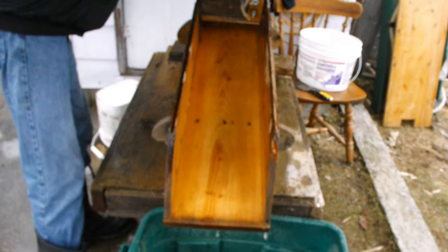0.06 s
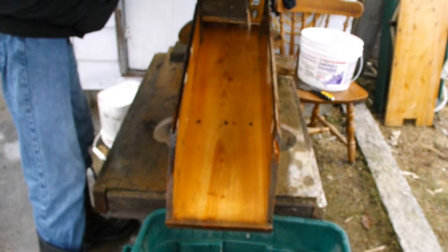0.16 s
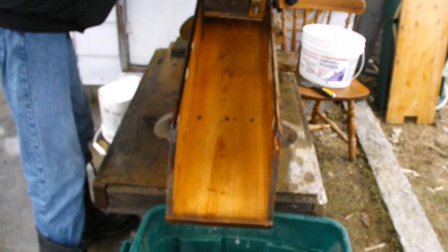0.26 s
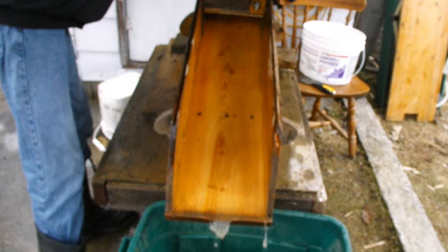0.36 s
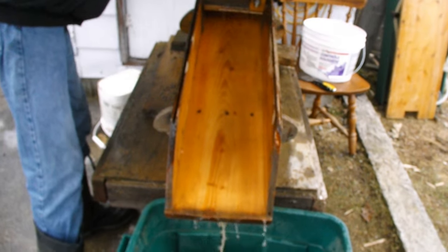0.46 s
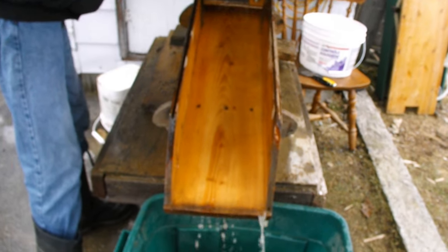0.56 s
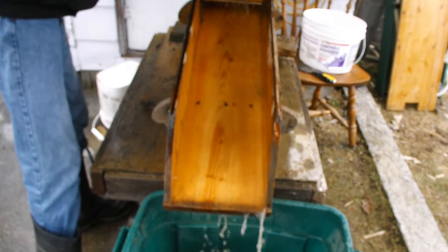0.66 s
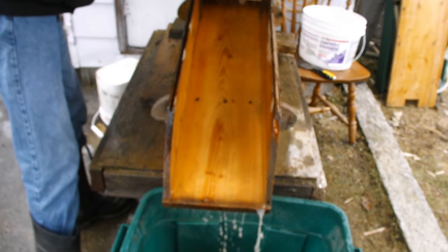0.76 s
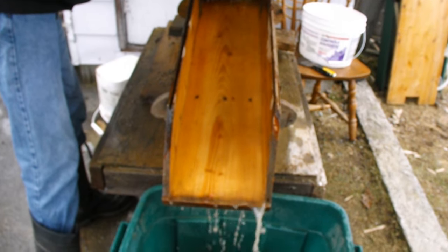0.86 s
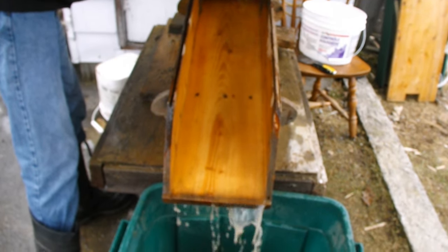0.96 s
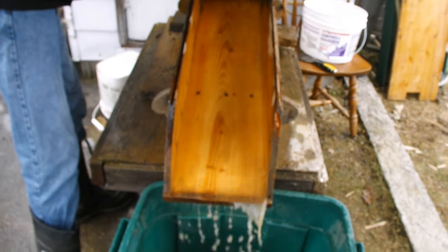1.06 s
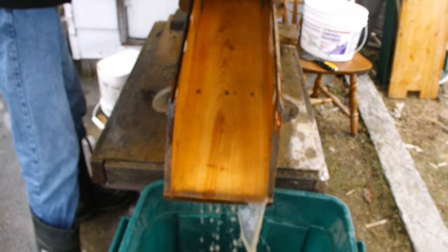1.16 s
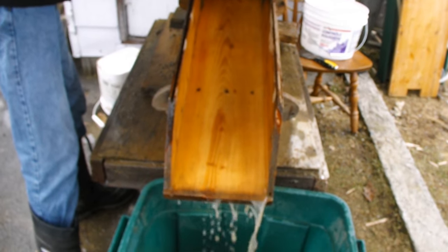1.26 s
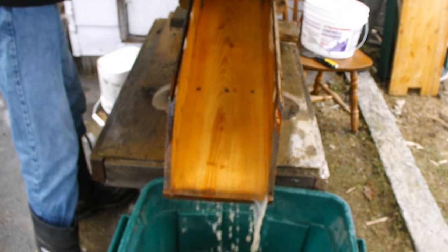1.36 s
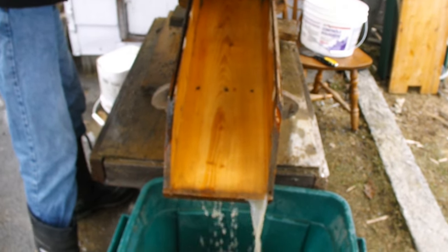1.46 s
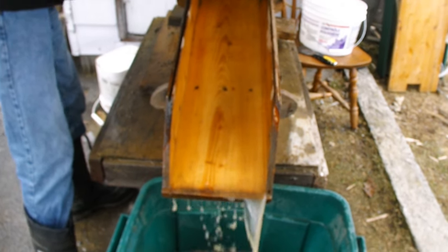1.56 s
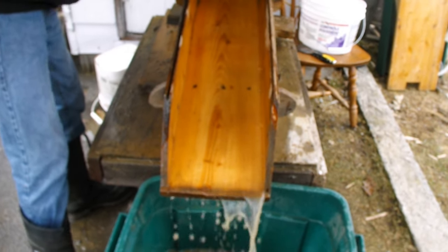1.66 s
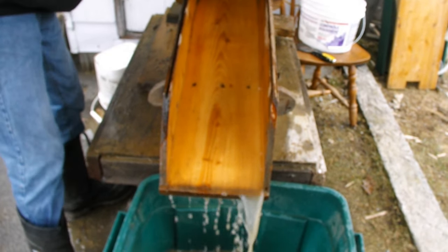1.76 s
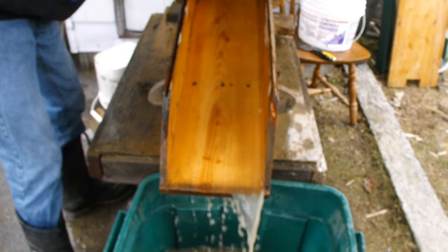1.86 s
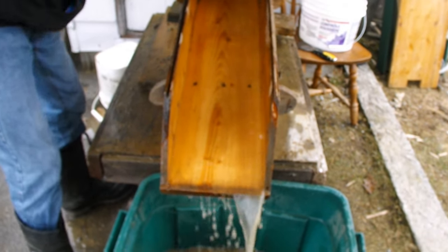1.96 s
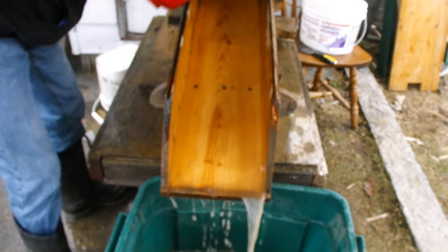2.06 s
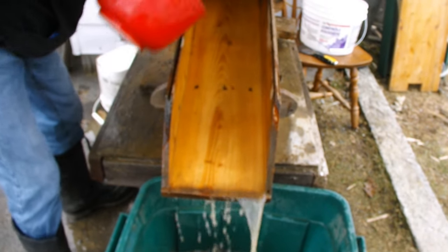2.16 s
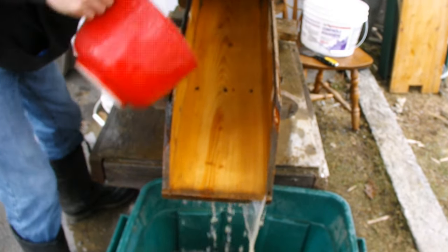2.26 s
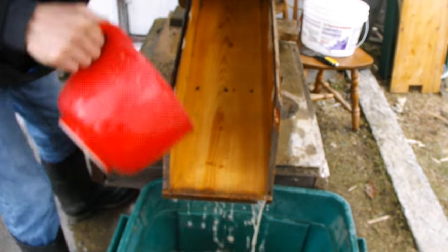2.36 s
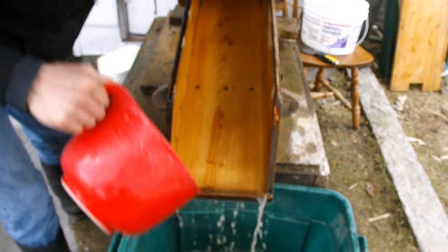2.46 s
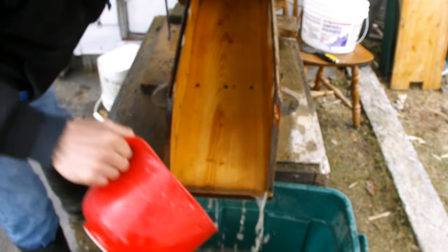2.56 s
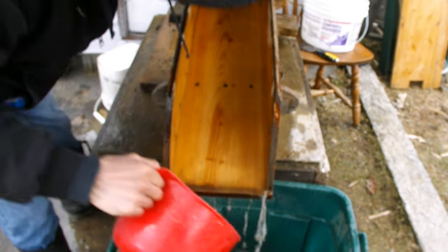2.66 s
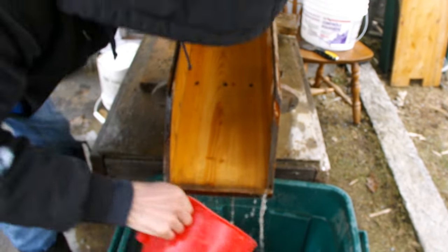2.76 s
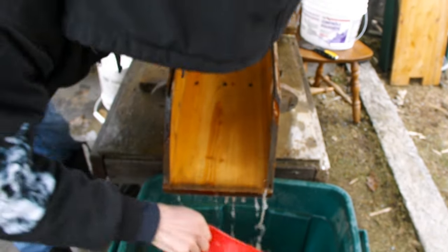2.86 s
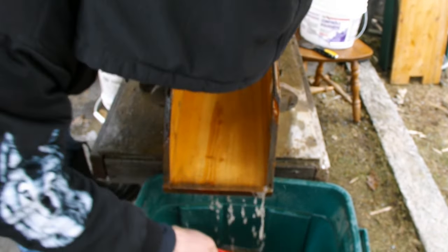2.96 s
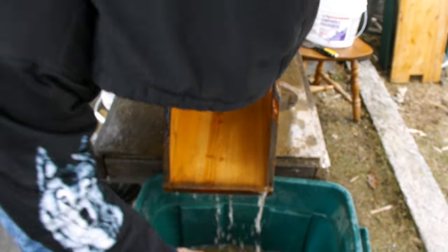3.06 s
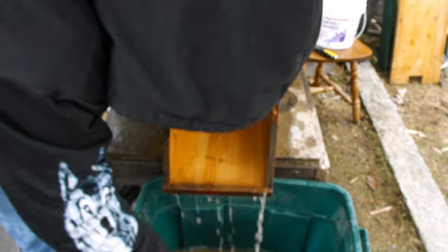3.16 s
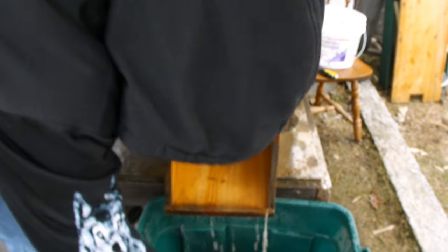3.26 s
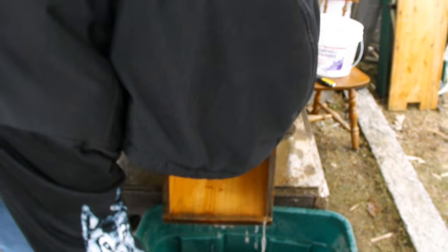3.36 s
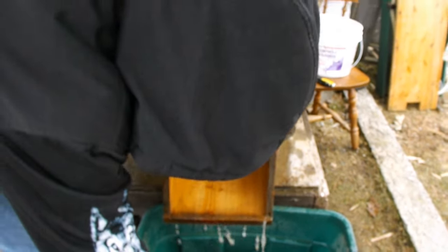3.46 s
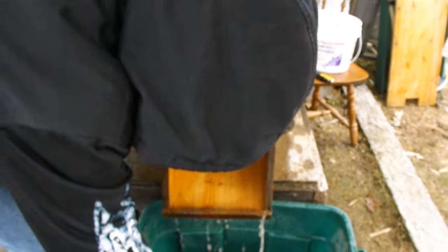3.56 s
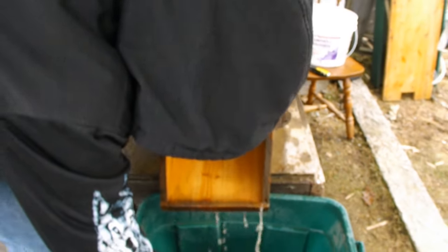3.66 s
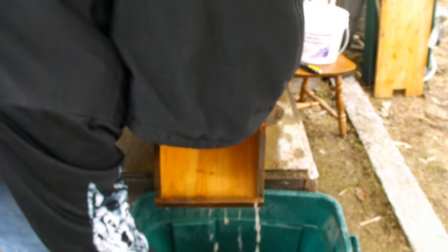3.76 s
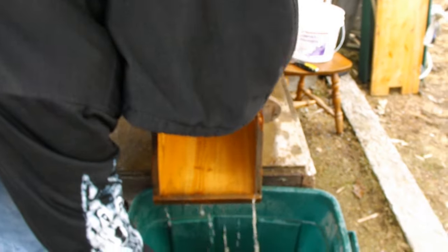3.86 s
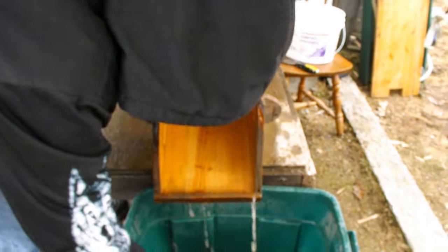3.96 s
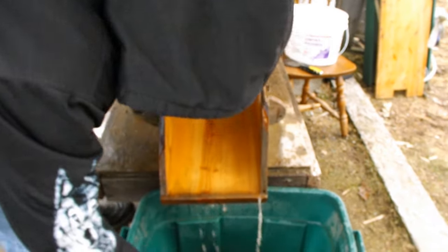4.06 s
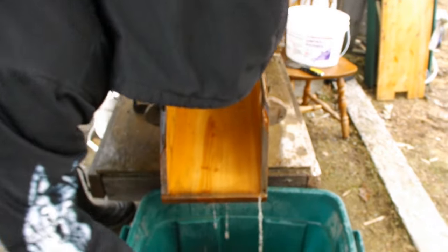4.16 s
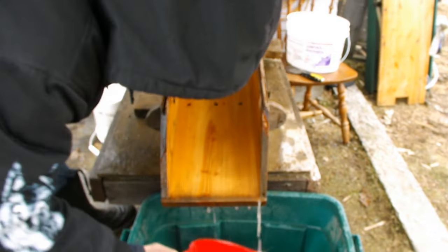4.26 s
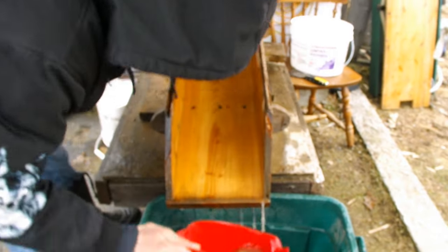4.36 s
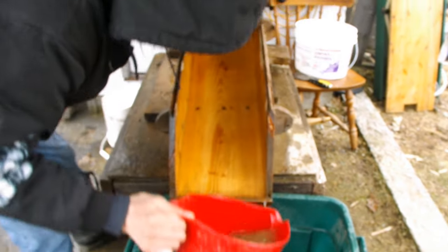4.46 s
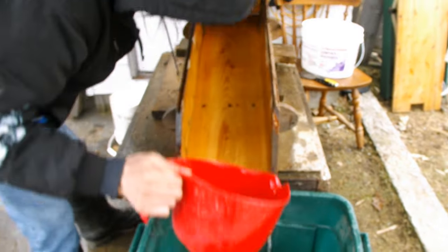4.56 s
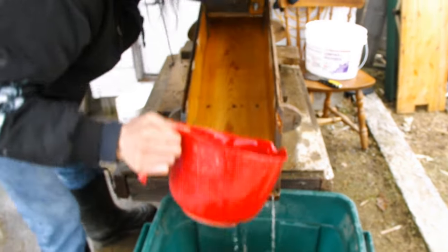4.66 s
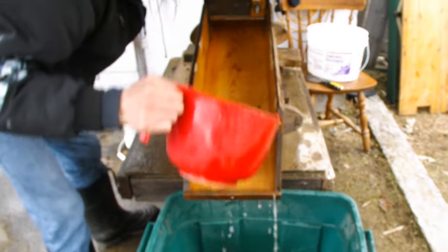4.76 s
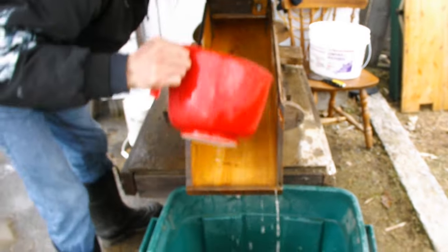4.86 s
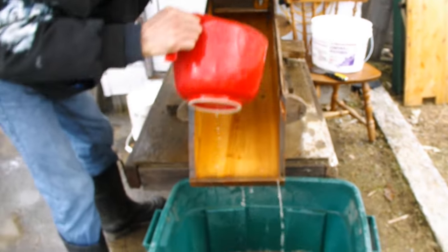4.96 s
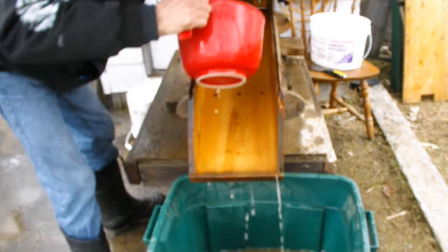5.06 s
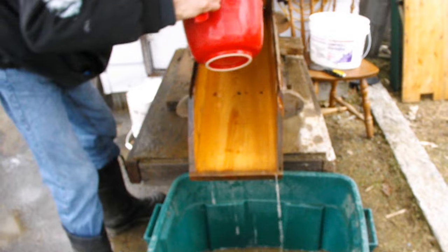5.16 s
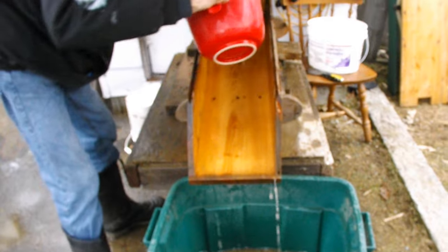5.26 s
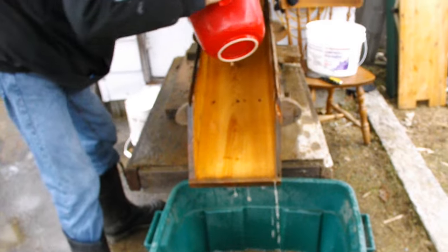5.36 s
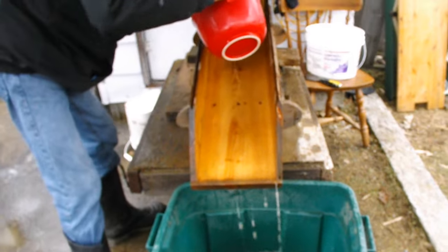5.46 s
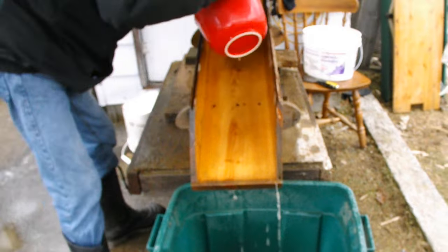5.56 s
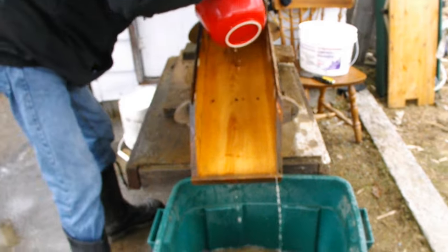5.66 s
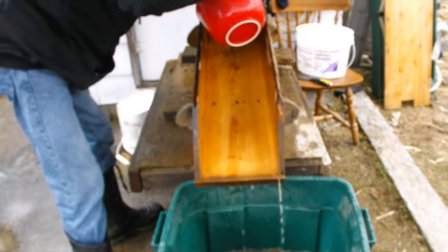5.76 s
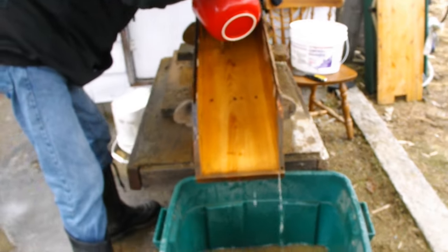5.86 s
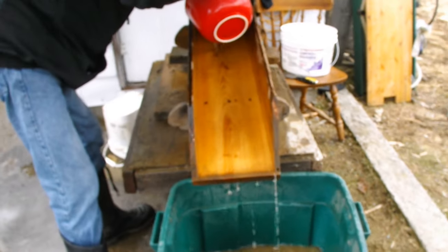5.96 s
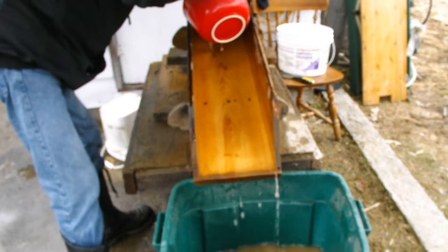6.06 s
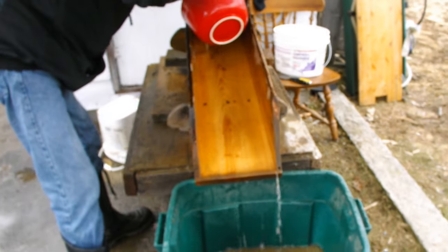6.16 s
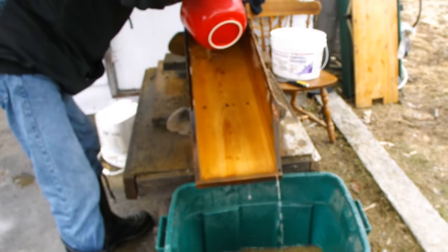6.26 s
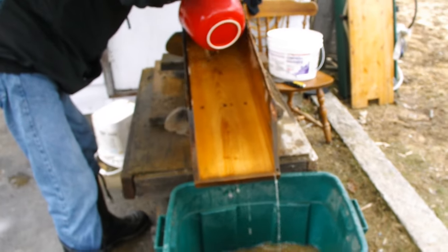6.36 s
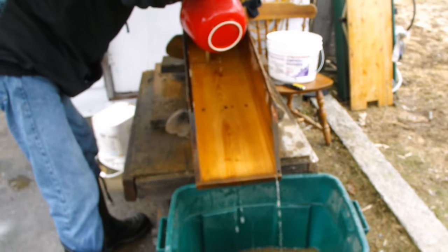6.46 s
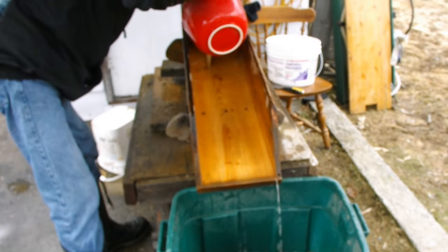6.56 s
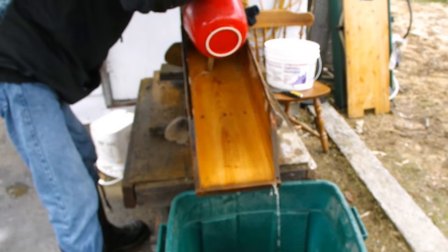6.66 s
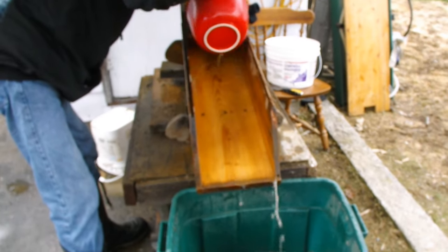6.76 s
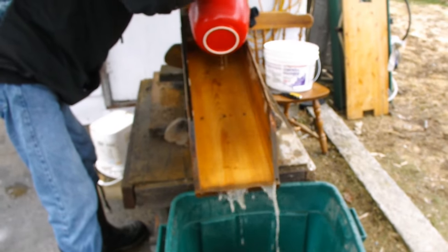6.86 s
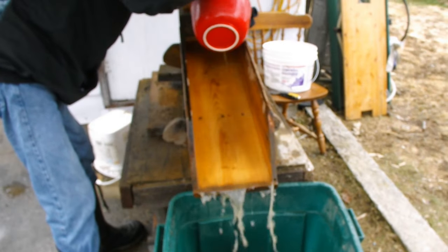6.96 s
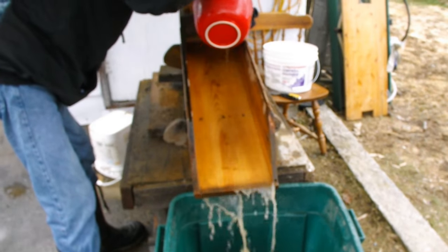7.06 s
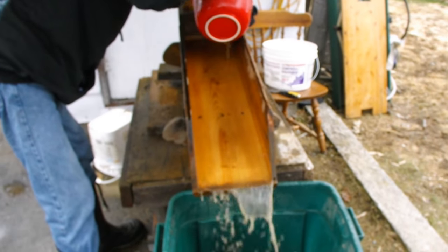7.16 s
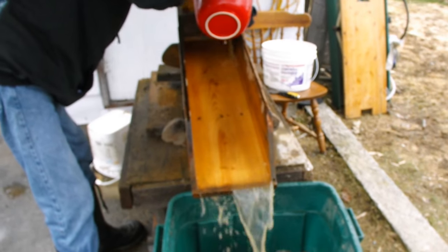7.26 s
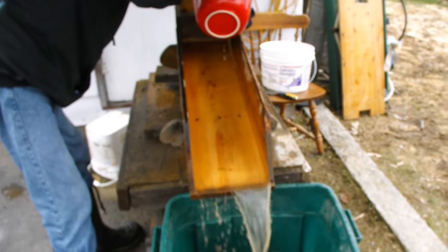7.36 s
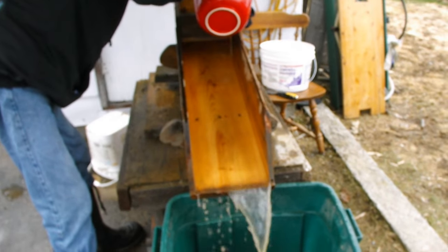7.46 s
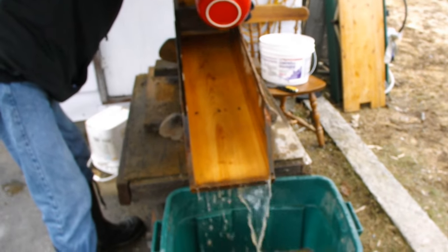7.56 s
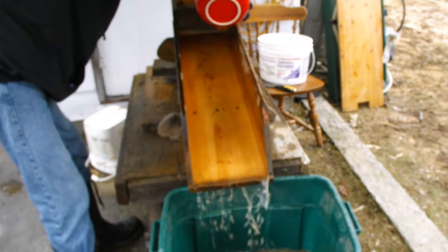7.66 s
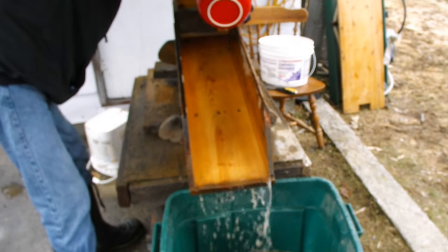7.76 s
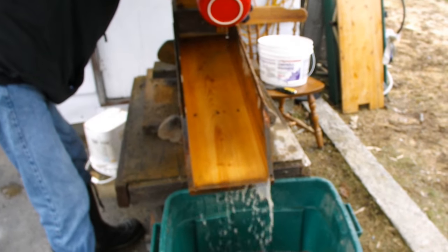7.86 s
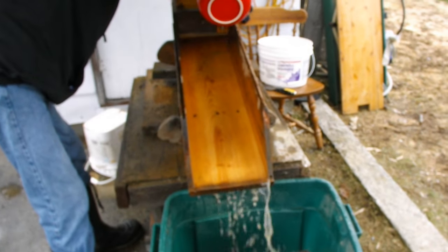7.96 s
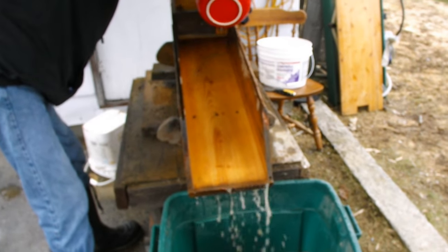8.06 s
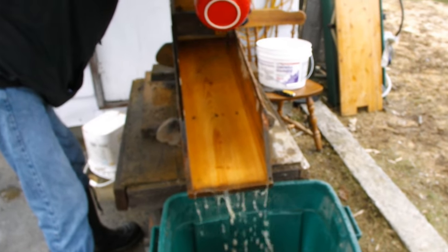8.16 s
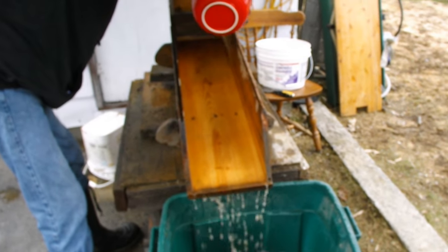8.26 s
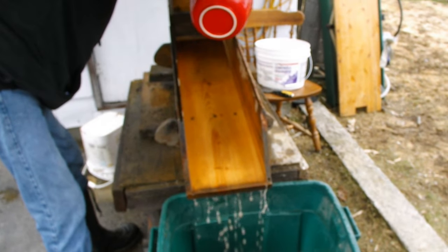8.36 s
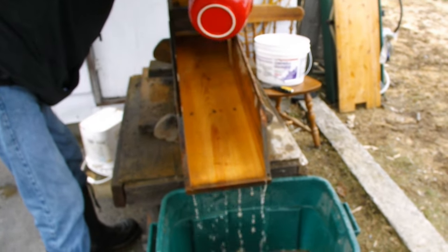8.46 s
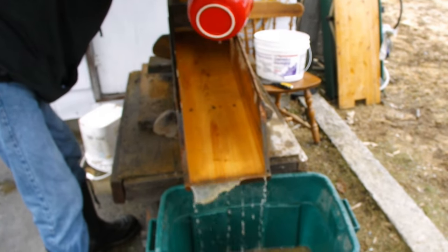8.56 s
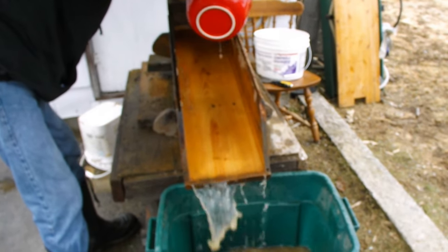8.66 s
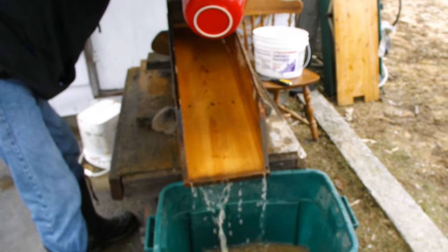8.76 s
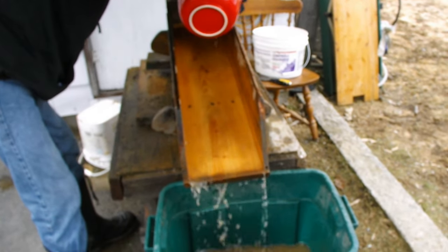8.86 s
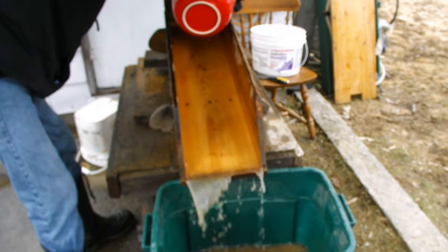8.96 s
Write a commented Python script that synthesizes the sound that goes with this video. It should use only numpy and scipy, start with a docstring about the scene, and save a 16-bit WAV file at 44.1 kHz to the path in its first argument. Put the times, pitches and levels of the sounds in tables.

```python
"""Water streams off the lip of a wooden sluice into a plastic tub.
Stream: random droplet impacts through pitched resonances. Splats, plops, drips: shaped noise and ticks, ringing.
Bubbles: swelling sines, mostly gliding up. The tub rings with the splash, echoes it and drums under pushes.
Low gusts and steady hiss lie underneath; two close microphone ports hear it all a moment apart."""
import sys
import numpy as np
from scipy import signal
from scipy.fft import rfft, irfft
from scipy.io import wavfile

SR = 44100
rng = np.random.default_rng(int(sys.argv[2]) if len(sys.argv) > 2 else 0)


def output_pcm(signal):
    """Save a mono or channel-first signal as 16-bit PCM at the path in sys.argv[1].

    Samples are clipped to [-1, 1] before scaling.
    """
    pcm = np.clip(np.atleast_2d(signal).T, -1, 1) * 32767
    wavfile.write(sys.argv[1], SR, np.round(pcm).astype(np.int16))


N = 396900

# Table levels are relative settings; each source adds its own gain.
# Falling stream: (time [s], bright spray level [dB], duller body relative to spray [dB])
STREAM_CURVE = [(0, -54.5, -11), (.68, -50, -11.5), (.93, -46, -10), (1.08, -40.5, -15.5), (2.0, -38, -8),
                (2.5, -35.5, -10.5), (2.68, -42.5, -14), (3.08, -42.5, -16.5), (3.24, -38, -31),
                (3.42, -50.5, -10), (3.8, -52.5, -5), (4.04, -42.5, -4.5), (4.2, -52, -6),
                (4.38, -49.5, -10), (4.62, -45.5, -10), (4.85, -45, -20), (4.97, -61, 1), (5.7, -50, -7.5),
                (5.93, -60, -3.5), (6.45, -50.5, -6), (7.05, -45.5, -8), (7.22, -37, -19),
                (7.57, -34.5, -6), (7.9, -42.5, -15.5), (8.25, -39, -12.5), (8.55, -39.5, -13.5),
                (8.78, -48.5, -13.5), (9, -38.5, -5)]
# Colour of the drops: (frequency [Hz], relative gain [dB])
SPRAY_COLOUR = [(240, -55), (400, -59), (555, -20), (704, -29), (781, -16), (907, -22.5), (1370, -14.5),
                (1480, -20.5), (1880, -8.5), (2690, -7.5), (4320, 1), (7500, -19), (14000, -36)]
# Air and wall of the tub ringing with the splash: (frequency [Hz], width [Hz], gain [dB])
HOLLOW_MODES = [(560, 8.3, -4), (739, 97, -12.5), (1015, 20, -7.5), (1460, 39, -7.5), (1690, 17, -14),
                (1866, 38, -8), (2370, 39, -8.5)]
# Air and electronics: (frequency [Hz], relative level [dB])
HISS_COLOUR = [(20, -7), (150, -3.5), (400, 5.5), (1000, 10), (3000, 1.5), (4300, 13), (7000, 6),
               (12000, 5.5), (16000, 8)]
# Single bubbles, low and high: (peak time [s], start pitch [Hz], rise [octaves/s], length [s], level [dB])
SINGLE_BUBBLES = [(0.35, 2700, 1.5, 0.022, -43), (0.608, 764, -1, 0.04, -49), (0.775, 1927, 5, 0.016, -36),
                  (0.793, 951, 0, 0.011, -43), (0.795, 357, -3.5, 0.022, -44), (0.806, 515, -2, 0.007, -36),
                  (0.815, 314, 19, 0.063, -52), (0.847, 560, 50, 0.029, -38),
                  (0.871, 574, 0.5, 0.022, -49.5), (0.955, 837, 9.5, 0.026, -48),
                  (1.007, 845, 10, 0.029, -45), (1.007, 1295, 0, 0.022, -43),
                  (1.055, 583, 16.5, 0.062, -53.5), (1.099, 890, 16, 0.009, -33),
                  (1.128, 850, 8.5, 0.019, -38.5), (1.302, 877, 6, 0.018, -33.5),
                  (1.538, 787, 12, 0.011, -34), (1.61, 993, 3.5, 0.018, -49), (1.752, 882, 3, 0.016, -45.5),
                  (1.872, 1430, -0.8, 0.026, -56), (1.809, 852, 1.5, 0.023, -39),
                  (1.97, 450, 17.5, 0.031, -44), (2.12, 626, 11, 0.022, -33),
                  (2.152, 706, 10, 0.027, -43.5), (2.188, 966, -3.5, 0.016, -40),
                  (2.272, 537, 30.5, 0.013, -28), (2.296, 531, 11, 0.011, -36.5),
                  (2.41, 678, 15, 0.04, -46), (2.449, 562, 6, 0.0072, -37.5), (2.475, 517, 9.5, 0.092, -50),
                  (2.639, 792, 8, 0.04, -45), (2.783, 713, 3, 0.067, -49.5), (2.803, 2670, 2, 0.032, -36),
                  (2.831, 966, 15, 0.031, -48), (2.835, 657, -4, 0.019, -42.5),
                  (2.861, 720, 18, 0.0045, -36.5), (2.966, 1800, 1, 0.0049, -34),
                  (2.972, 713, 13, 0.029, -51.5), (3.22, 2100, 7, 0.021, -36.5),
                  (3.24, 1070, 4.5, 0.016, -47), (3.425, 1244, -6, 0.039, -52.5),
                  (3.505, 402, 3, 0.058, -53.5), (3.535, 582, 12, 0.033, -41),
                  (3.541, 1907, 0.5, 0.017, -44), (3.651, 3160, 8, 0.0075, -35),
                  (3.685, 560, 1.5, 0.021, -51), (3.707, 554, 40, 0.12, -39.5),
                  (3.874, 450, 20, 0.0036, -33), (3.942, 1028, 4, 0.019, -41),
                  (3.964, 2900, 23, 0.011, -36), (3.972, 1930, 13.5, 0.021, -32.5),
                  (4.014, 519, 1, 0.0056, -28.5), (4.026, 3020, 22, 0.017, -37), (4.02, 755, 4, 0.01, -36),
                  (4.038, 656, 15, 0.011, -35), (4.045, 887, 11, 0.023, -45), (4.09, 1180, 5.5, 0.025, -42),
                  (4.102, 484, 22, 0.023, -49), (4.136, 643, 3.5, 0.029, -42.5),
                  (4.186, 898, 6.5, 0.02, -38.5), (4.525, 955, 2.5, 0.034, -51),
                  (4.628, 750, 25, 0.0074, -42.5), (4.674, 628, 20, 0.01, -36),
                  (4.692, 1073, -1, 0.0098, -35.5), (4.758, 1790, 15, 0.023, -43),
                  (4.766, 758, 14.5, 0.018, -38.5), (4.792, 950, 8, 0.0075, -37.5),
                  (4.8, 2020, -2, 0.013, -40), (4.856, 1046, -0.5, 0.024, -46.5),
                  (4.986, 593, 5, 0.031, -49.5), (5.069, 2460, 23, 0.011, -46),
                  (5.099, 2610, -1, 0.015, -40.5), (5.331, 561, 3.5, 0.042, -48),
                  (5.355, 1172, -1, 0.022, -37.5), (5.378, 1225, 92, 0.037, -44.5),
                  (5.56, 1450, 4, 0.012, -48), (5.65, 1037, -0.5, 0.022, -46.5),
                  (5.682, 2500, 8, 0.014, -43), (5.726, 2550, 10, 0.023, -41), (5.74, 1010, 1, 0.023, -51),
                  (5.836, 662, 9.5, 0.021, -38.5), (5.862, 780, 71, 0.026, -42.5),
                  (5.985, 660, 62.5, 0.056, -49), (6.127, 740, -0.5, 0.04, -55),
                  (6.259, 1005, 3, 0.047, -44), (6.311, 1195, 5, 0.012, -39.5),
                  (6.335, 794, -1.5, 0.0094, -32.5), (6.361, 753, 0.5, 0.024, -50),
                  (6.417, 2765, 0.9, 0.043, -41.5), (6.61, 1710, 16, 0.025, -41.5),
                  (6.648, 377, 49, 0.0034, -38.5), (6.727, 1077, 10, 0.009, -44),
                  (6.72, 1745, 1.5, 0.068, -55), (6.766, 1320, 4, 0.014, -41),
                  (6.883, 1633, 10, 0.012, -35.5), (7.122, 2170, -8.5, 0.014, -36),
                  (7.141, 553, 0.8, 0.026, -42), (7.146, 541, 29, 0.062, -43), (7.18, 1044, 5, 0.015, -34),
                  (7.333, 904, 14, 0.013, -51), (7.46, 2910, 0, 0.014, -27.5),
                  (7.536, 497, 2.5, 0.072, -52), (7.643, 330, 22, 0.015, -42), (7.65, 499, 6, 0.034, -44.5),
                  (7.945, 743, -4, 0.023, -57), (8.02, 491, 6.5, 0.1, -56.5),
                  (8.035, 1046, 3, 0.021, -44.5), (8.25, 1200, 3, 0.01, -31), (8.332, 750, -0.8, 0.04, -46),
                  (8.332, 2190, 6, 0.011, -29.5), (8.436, 2450, -9, 0.035, -41),
                  (8.44, 676, -1, 0.033, -48), (8.44, 1897, 2.5, 0.029, -36.5),
                  (8.548, 694, 8.5, 0.087, -51.5), (8.562, 2620, 3.5, 0.051, -42),
                  (8.61, 2440, 11, 0.06, -44), (8.662, 1594, 2, 0.015, -46), (8.687, 760, 7, 0.016, -50),
                  (8.719, 758, -0.5, 0.036, -49.5), (8.813, 1540, 9, 0.012, -41),
                  (8.865, 3030, -16, 0.017, -34), (8.951, 1970, 2.5, 0.024, -37),
                  (8.965, 571, 15, 0.085, -48.5)]
# Single splats: (time [s], level [dB], pitch [Hz], t60 [s], duller body [dB], crisp top [dB]),
# body and top relative to level
SPLAT_EVENTS = [(0.176, -35.5, 3020, 0.037, -30, -29), (0.196, -25.5, 4380, 0.093, -41, -29),
                (0.28, -29.5, 5330, 0.027, -28, -22), (0.348, -30.5, 2790, 0.075, -24, -24),
                (0.384, -34, 5300, 0.067, -25, -21), (0.437, -35, 3820, 0.063, -26, -22),
                (0.483, -27.5, 5100, 0.11, -9, -29), (0.629, -22, 4500, 0.064, -19, -21),
                (0.728, -23.5, 4760, 0.21, -12.5, -28), (0.7802, -31, 5000, 0.079, -23, -23),
                (0.831, -36, 5040, 0.12, -25, -22), (0.8532, -28.5, 4430, 0.12, -20, -26),
                (0.886, -30.5, 4630, 0.29, -28, -21), (0.9263, -22, 4600, 0.072, -33, -33),
                (0.943, -26.5, 4100, 0.35, -15, -33), (1.006, -26, 3360, 0.1, -10, -33),
                (1.0632, -28, 4220, 0.09, -12, -29), (1.102, -24.5, 4500, 0.13, -26, -34),
                (1.1163, -23, 4120, 0.11, -7, -31), (1.145, -19.5, 4640, 0.04, -18, -30),
                (1.209, -21, 3830, 0.21, -21, -26), (1.317, -28, 4340, 0.16, -7, -29),
                (1.3675, -22, 4230, 0.18, -25, -28), (1.4195, -23.5, 4300, 0.17, -7, -30),
                (1.488, -29, 4400, 0.27, -34, -27), (1.566, -27.5, 4250, 1, -18, -30),
                (1.624, -20, 3560, 0.086, -16, -36), (1.686, -20, 5230, 0.053, -29, -29),
                (1.7534, -18, 4420, 0.058, -29, -31), (1.792, -29, 4340, 0.51, -11, -24),
                (1.8827, -26, 4230, 0.14, -18, -29), (1.9175, -18, 3970, 0.025, -13, -32),
                (1.972, -23.5, 4000, 0.18, -26, -26), (2.0485, -22.5, 4230, 0.18, -24, -26),
                (2.084, -12.5, 4550, 0.085, -25, -17), (2.1171, -23, 4300, 0.072, -10, -31),
                (2.153, -21.5, 4070, 0.2, -5, -33), (2.2224, -26, 2570, 0.099, -9, -26),
                (2.254, -24.5, 4000, 0.23, -22, -29), (2.2737, -21, 3300, 0.13, -6, -34),
                (2.3231, -29.5, 4250, 0.4, -11, -25), (2.5426, -21, 4370, 0.13, -29, -34),
                (2.581, -29, 4730, 0.2, -30, -28), (2.63, -20, 4380, 0.14, -41, -35),
                (2.654, -19, 4240, 0.04, -31, -35), (3.0305, -25, 4330, 0.054, -32, -31),
                (3.0674, -31, 4080, 0.063, -22, -24), (3.1707, -33, 4270, 0.33, -18, -26),
                (3.3288, -24, 4880, 0.25, -35, -15), (3.4624, -33.5, 4700, 0.045, -25, -23),
                (3.522, -27.5, 4200, 0.15, -37, -26), (3.6456, -22, 3860, 0.02, -9, -35),
                (3.6621, -14.5, 4260, 0.065, -22, -35), (3.849, -25.5, 4450, 0.18, -40, -25),
                (3.917, -28.5, 4520, 0.23, -13, -10), (3.972, -29.5, 3050, 0.033, 1, -30),
                (4.0257, -33, 4320, 0.45, -11, -28), (4.0793, -34, 2570, 0.16, -3, -27),
                (4.395, -36, 4660, 0.17, -24, -25), (4.443, -34, 4100, 0.55, -38, -22),
                (4.576, -22.5, 4250, 0.097, -17, -24), (4.7073, -30.5, 4430, 0.12, -11, -25),
                (4.835, -32, 3900, 0.21, -26, -25), (5.0653, -30.5, 3730, 0.098, -0.5, -28),
                (5.0973, -27, 3760, 0.1, -30, -30), (5.184, -32, 3900, 0.15, -17, -25),
                (5.213, -31, 3000, 0.25, -9, -28), (5.3133, -26.5, 4100, 0.067, -10, -28),
                (5.439, -24.5, 4140, 0.2, -13, -34), (5.563, -29, 3670, 0.034, -26, -27),
                (5.591, -34, 4040, 0.067, -27, -26), (5.7088, -31.5, 4100, 0.31, -10, -27),
                (5.909, -32.5, 5800, 0.027, -14, -24), (6.1508, -37, 3900, 0.12, -17, -21),
                (6.3445, -28.5, 4700, 0.045, -21, -25), (6.4172, -30, 3030, 0.035, -29, -29),
                (6.543, -34, 4900, 0.21, -39, -1), (6.782, -30, 4540, 0.044, -24, -29),
                (6.86, -36, 4970, 0.082, -21, -26), (6.942, -35, 3630, 0.29, -16, -18),
                (7.038, -22.5, 4280, 0.064, -16, 4.5), (7.185, -25, 3740, 0.45, -8, -13),
                (7.307, -27, 3170, 0.28, -29, -29), (7.3318, -22.5, 4370, 0.23, -14, -31),
                (7.393, -28, 3600, 0.11, 3, -30), (7.439, -25, 4960, 0.11, -1, -30),
                (7.4623, -20, 4100, 0.25, -11, -38), (7.582, -23.5, 5000, 0.18, -6.5, -28),
                (7.6385, -25, 4580, 0.76, -5.5, -28), (7.7516, -24.5, 4220, 0.028, -33, -23),
                (7.896, -30.5, 3800, 0.1, 0, -24), (7.919, -28.5, 4550, 0.15, -4, -26),
                (8.0394, -29.5, 4470, 0.067, -24, -28), (8.0842, -26, 3700, 0.23, -11, -33),
                (8.178, -29.5, 2490, 0.29, -20, -18), (8.194, -26, 4270, 0.095, -26, -28),
                (8.2109, -21.5, 2560, 0.066, -29, -33), (8.2632, -21.5, 4440, 0.13, -31, -28),
                (8.297, -23, 3960, 0.062, -6, -35), (8.3537, -28, 4800, 0.083, -24, -20),
                (8.404, -33.5, 3760, 0.15, -24, -25), (8.436, -21, 3020, 0.05, -22, -35),
                (8.482, -25, 4150, 0.092, -19, -28), (8.514, -15.5, 4320, 0.04, -38, -32),
                (8.5577, -15.5, 4450, 0.067, -9.5, -10), (8.67, -31.5, 3920, 0.04, -21, -23),
                (8.714, -28.5, 4200, 0.13, -17, -26), (8.7613, -26, 4440, 0.094, -31, -27),
                (8.863, -19, 4140, 0.17, -14.5, -24), (8.914, -22, 3900, 0.21, -23, -31)]
# Duller plops in deeper water: (time [s], level [dB], pitch [Hz], t60 [s])
PLOP_EVENTS = [(0.9443, -38, 2660, 0.1), (1.063, -27.5, 1780, 0.049), (1.1233, -28, 2870, 0.092),
               (1.203, -29, 2200, 0.18), (1.281, -27.5, 1990, 0.08), (1.3315, -28.5, 1910, 0.12),
               (1.3738, -29, 2370, 0.13), (1.45, -27.5, 2010, 0.052), (1.495, -32, 2140, 0.09),
               (1.544, -29, 2320, 0.091), (1.5673, -33, 2290, 0.14), (1.6537, -32, 2130, 0.12),
               (1.8455, -29.5, 2370, 0.089), (2.097, -22.5, 2970, 0.12), (2.142, -32, 1910, 0.08),
               (2.389, -28.5, 3020, 0.15), (2.713, -35.5, 1460, 0.24), (2.9684, -30, 1580, 0.11),
               (3.1627, -32.5, 2270, 0.14), (3.276, -31, 2080, 0.07), (3.3408, -38, 2970, 0.12),
               (3.38, -37, 1920, 0.11), (3.6237, -40, 2780, 0.1), (4.116, -35, 1920, 0.066),
               (4.1853, -35, 1510, 0.072), (4.669, -32, 1390, 0.075), (4.8504, -32.5, 1640, 0.063),
               (5.3143, -33.5, 2440, 0.073), (5.5398, -46, 2140, 0.1), (5.621, -41, 1410, 0.18),
               (5.7084, -34, 1960, 0.13), (5.8325, -38.5, 2110, 0.078), (6.515, -39, 1520, 0.073),
               (7.242, -26, 2150, 0.11), (7.3637, -25.5, 1690, 0.24), (7.5712, -26.5, 2520, 0.1),
               (7.643, -36, 2750, 0.1), (7.6884, -35, 2480, 0.1), (7.7722, -34, 2400, 0.2),
               (7.936, -28, 2250, 0.052), (8.123, -30, 2480, 0.13), (8.1538, -30, 2170, 0.11),
               (8.264, -27, 2630, 0.14), (8.8877, -28, 2460, 0.1)]
# Light drips ticking on the surface: (time [s], level [dB], pitch [Hz])
DRIP_EVENTS = [(1.5374, -22.5, 4370), (2.798, -32.5, 2620), (2.8419, -28.5, 3650), (3.1138, -47, 3680),
               (3.2444, -24.5, 4800), (3.4251, -35, 4300), (3.7289, -36, 4940), (4.1934, -31.5, 4650),
               (4.4774, -33, 3990), (4.5361, -28, 4230), (4.6224, -29, 4690), (4.8823, -35, 4180),
               (4.9761, -38, 3310), (5.0085, -38, 3820), (5.0374, -36, 2820), (5.0529, -32, 3900),
               (5.3842, -39, 2000), (5.7798, -34, 4350), (6.0162, -37, 3860), (6.1833, -35, 4800),
               (6.2442, -43, 3750), (6.4772, -42, 4090), (6.5166, -44, 2790), (6.5879, -32.5, 4220),
               (6.6338, -33, 2700), (6.6538, -38, 3440), (6.7506, -36, 3960), (7.3484, -24, 4500),
               (8.4435, -21.5, 2550)]
# Tub wall modes: (frequency [Hz], width of first pass [Hz], relative gain [dB])
TUB_MODES = [(209, 31, -4.5), (300, 55, -9.5)]
# Stream or scoop pushing on the tub wall: (start [s], length [s], level [dB])
WALL_PUSHES = [(1.65, 0.14, -59), (1.755, 0.13, -53), (1.95, 0.17, -53.5), (2.065, 0.15, -56.5),
               (2.25, 0.21, -54.5), (3.87, 0.02, -62), (4.004, 0.012, -40.5), (4.045, 0.015, -60),
               (4.094, 0.023, -48), (4.293, 0.034, -59), (4.45, 0.11, -64.5), (7.55, 0.19, -62.5),
               (8.845, 0.011, -50)]
# Low gusts on the microphone: (start [s], length [s], level [dB])
GUST_EVENTS = [(4.284, 0.034, -67), (4.38, 0.05, -76), (5.97, 0.086, -67), (6.13, 0.045, -73)]

FULL_FLOW_DB, DROPS_FOLLOW = -38, .5   # drop rate follows this share of the spray's dB from full flow
HISS_RMS_DB = -51.5
BUBBLE_SWELL_S, TAIL_SHARE = .004, .05   # swell from bubble start to peak time; lingering tail
GLIDE_LOSS_DB_PER_OCTAVE = 5.5
CHANCE_BUBBLE_CYCLES = 24   # times .58 to 1.58 by chance
SPLAT_SWELL_S = .0051   # slope of the fizz build-up, which starts at half
RING_SPREAD_OCTAVES, RING_WIDTH_HZ = .3, 220   # chance rings either side of a splat's pitch
PLOP_ATTACK_S, PLOP_WIDTH_HZ = .00068, 510
DRIP_T60_S, DRIP_WIDTH_HZ = .09, 560
PUSH_ATTACK_S, PUSH_T60_S = .0018, .065
GUST_ATTACK_S, GUST_T60_S = .012, .12
ECHO_LAGS_S, ECHO_LOOP, ECHO_DB = [.0013, .0023, .0037, .0059], .55, -14
PORT_LAG_S, STOPBAND_HZ = 2.1e-5, 15900


def from_db(db):
    """Gain of a level in dB."""
    return 10 ** (np.asarray(db) / 20)


def rms_one(x):
    """Scale to rms 1."""
    return x / np.sqrt(np.mean(x ** 2) + 1e-20)


def in_time(rows):
    """Curve columns at every sample."""
    s, *columns = np.transpose(rows)
    return [np.interp(np.arange(N) / SR, s, c) for c in columns]


def at_hz(points, hz):
    """Spectrum interpolated on a log-frequency axis."""
    points = np.array(points)
    return np.interp(np.log(hz), np.log(points[:, 0]), points[:, 1])


def drift(rate_hz):
    """Slow chance of rms 1: noise at SR / 40 through a double one-pole low-pass."""
    r = np.exp(-80 * np.pi * rate_hz / SR)
    noise = rng.standard_normal(N // 40 + 2002)
    slow = signal.lfilter([1], [1, -2 * r, r * r], noise)[2000:]   # skip the filter's start-up
    return np.interp(np.arange(N) / 40, np.arange(len(slow)), rms_one(slow))


def resonate(x, hz, width_hz):
    """Two-pole resonance with gain 1 on top."""
    r = np.exp(-np.pi * width_hz / SR)
    zeros = (1 - r * r) / 2 * np.array([1, 0, -1])
    poles = [1, -2 * r * np.cos(2 * np.pi * hz / SR), r * r]
    return signal.lfilter(zeros, poles, x + 1e-18)


def band_pass(x, low_hz, high_hz):
    """Second-order Butterworth band."""
    return signal.sosfilt(signal.butter(2, [low_hz, high_hz], "band", fs=SR, output="sos"), x)


def swells(rows, attack_s, t60_s):
    """Sum of envelopes that rise, hold and die away."""
    t, total = np.arange(N) / SR, np.zeros(N)
    for s, length_s, db in rows:
        rise = np.clip((t - s) / attack_s, 0, 1)
        total += rise * from_db(db - 60 * np.clip((t - s - length_s) / t60_s, 0, 4))
    return total


def hollow(x):
    """Tub modes ring along with whatever splashes in it."""
    return sum(from_db(db) * resonate(x, hz, width_hz) for hz, width_hz, db in HOLLOW_MODES)


def droplets(bright, dull, per_s, spread_db, cycles, patchy_db):
    """Random impacts ring some cycles each at their own pitch; each pitch comes in its own clumps."""
    sizes = from_db(spread_db * np.minimum(rng.exponential(1, N), 2.7)) * rng.choice([-1, 1], N)
    hits = rms_one(sizes * (rng.random(N) < per_s / SR) / np.sqrt(per_s))
    pitches_hz, dealt = np.geomspace(450, 13000, 36), rng.integers(0, 36, N)
    out = hollow(hits * dull)
    for k, hz in enumerate(pitches_hz):
        share = np.clip(np.log2(hz / 2200) / .5, 0, 1)   # bright drive above the crossover, dull below
        strength = share * bright + (1 - share) * dull
        drive = hits * (dealt == k) * strength * from_db(patchy_db * drift(16.8))
        plips = resonate(resonate(drive, hz, 2 * hz / cycles), hz, .88 * hz)
        out += from_db(at_hz(SPRAY_COLOUR, hz) + 23) * plips
    return out


def stream():
    """Patter of dense droplets; the stream breaks up, so its strength flutters."""
    spray_db, body_db = in_time(STREAM_CURVE)
    flutter_db = 2.4 * drift(15) + .6 * drift(50)
    bright = from_db(spray_db + flutter_db)
    dull = from_db(spray_db + body_db + 10 + 1.9 * flutter_db + 2 * drift(25))
    per_s = 5000 * from_db(DROPS_FOLLOW * (spray_db - FULL_FLOW_DB))
    return droplets(bright, dull, per_s, spread_db=3.2, cycles=44, patchy_db=4.2)


def hiss():
    """Steady noise of air and electronics, coloured in the spectrum."""
    colour = from_db(at_hz(HISS_COLOUR, np.maximum(np.fft.rfftfreq(N, 1 / SR), 1)))
    return from_db(HISS_RMS_DB) * rms_one(irfft(rfft(rng.standard_normal(N)) * colour, N))


def chirp(s, hz, rise, length_s, db):
    """Bubble near the surface: start sample and a sine that swells fast, glides, wobbles and dies."""
    t = np.arange(int(4.3 * length_s * SR)) / SR
    octaves = rise * t * (.8 + .4 * t / length_s)   # the glide speeds up
    phase = 2 * np.pi * np.cumsum(hz * 2 ** octaves) / SR
    # the surface above it is not still
    wobble = 1 + .39 * np.sin(.125 * phase + hz) + .099 * np.sin(.047 * phase + s * SR)
    fade = np.exp(-1.4 * (t / length_s) ** 2) + TAIL_SHARE * np.cos(np.pi / 2 * t / t[-1])
    shape = np.minimum(t / BUBBLE_SWELL_S, 1) * fade
    gain = from_db(db - GLIDE_LOSS_DB_PER_OCTAVE * np.abs(octaves))
    at = max(round((s - BUBBLE_SWELL_S) * SR), 0)
    return at, (gain * shape * wobble * np.sin(phase))[:N - at]


def bubbles():
    """Single bubbles, low and high, and many chance ones following the stream; each cavity knocks as it shuts."""
    out, knocks = np.zeros((2, N))
    spray_db, body_db = in_time(STREAM_CURVE)
    rows = list(SINGLE_BUBBLES)
    for s, size, rise, life, faint in rng.random((2200, 5)) * [N / SR, 1, 1, 1, 1]:
        hz = 1000 * 2 ** (2.4 * size)
        at = int(s * SR)
        level_db = spray_db[at] + (hz < 2600) * body_db[at] - .4 - 14 * faint
        rows.append((s, hz, 22.6 * rise ** 2, CHANCE_BUBBLE_CYCLES * (.58 + life) / hz, level_db))
    for s, hz, rise, length_s, db in rows:
        at, tone = chirp(s, hz, rise, length_s, db)
        out[at:at + len(tone)] += tone
        knocks[at] += from_db(db + 19)   # the cavity snaps shut as the bubble is born
    knocks = resonate(resonate(knocks, 930, 2600), 700, 4500)
    return out + knocks + from_db(11.5) * hollow(out + knocks)


def splats():
    """Quick contacts and fizz ring at the splat's pitch, with a crisp tick and a dying crowd of droplets."""
    bright, dull, contacts, ticks = np.zeros((4, N))
    chance, fizz = rng.random((len(SPLAT_EVENTS), 10)), rng.standard_normal(N)
    for (s, db, hz, t60_s, body_db, top_db), luck in zip(SPLAT_EVENTS, chance):
        at, t = round(s * SR), np.arange(int(t60_s * SR)) / SR
        tail = np.minimum(.5 + t / SPLAT_SWELL_S, 1) * from_db(db - 11 - 60 * t / t60_s)
        tail = tail[:N - at]
        now = slice(at, at + len(tail))
        bright[now] += tail
        dull[now] += tail * from_db(body_db + 16)
        ticks[now] += tail * from_db(top_db + 8.5 - 3200 * t[:len(tail)])
        # four contacts, tending to weaken
        delays_s = np.cumsum(.0043 * luck[:4]) - .004 * luck[0]
        taps = np.zeros(len(t))
        taps[(delays_s * SR).astype(int)] = from_db(db + 27 - 450 * delays_s - 4.3 * luck[4:8])
        noise = tail * fizz[now]
        drive = taps[:len(tail)] + from_db(9.5) * noise
        ring_hz = hz * 2 ** (RING_SPREAD_OCTAVES * (2 * luck[8:] - 1))
        rings = sum(resonate(noise, f, RING_WIDTH_HZ) for f in ring_hz)
        contacts[now] += resonate(resonate(drive, hz, 455) + from_db(12.5) * rings, hz, 1930)
    crisp = band_pass(ticks * fizz, 6000, 12500)
    crowd = droplets(bright, dull, per_s=8000., spread_db=2.5, cycles=28.4, patchy_db=-2.0)
    return contacts + crisp + crowd


def plops():
    """Drops in deeper water: bursts of fizz ring in a small cavity, dying fast."""
    out, fizz = np.zeros(N), rng.standard_normal(N)
    for s, db, hz, t60_s in PLOP_EVENTS:
        at, t = round(s * SR), np.arange(int(t60_s * SR)) / SR
        envelope = np.minimum(t / PLOP_ATTACK_S, 1) * from_db(db + 8 - 60 * t / t60_s)
        burst = fizz[at:at + len(t)] * envelope
        out[at:at + len(t)] += resonate(resonate(burst, hz, PLOP_WIDTH_HZ), hz, 2100)
    return out + from_db(-13) * hollow(out)


def drips():
    """One sharp tick and a short fizz at the drip's pitch."""
    out, fizz = np.zeros(N), rng.standard_normal(N)
    t = np.arange(int(DRIP_T60_S * SR)) / SR
    for s, db, hz in DRIP_EVENTS:
        at = round(s * SR)
        burst = fizz[at:at + len(t)] * from_db(db + 6 - 60 * t / DRIP_T60_S)
        tick = (t == 0) * from_db(db + 8)
        out[at:at + len(t)] += resonate(resonate(burst, hz, DRIP_WIDTH_HZ) + tick, hz, 3400)
    return out


def tub():
    """Uneven pushes drum on the plastic wall: noise through its modes."""
    push = rng.standard_normal(N) * swells(WALL_PUSHES, PUSH_ATTACK_S, PUSH_T60_S)
    out = np.zeros(N)
    for hz, width_hz, db in TUB_MODES:
        out += from_db(db + 23) * resonate(resonate(push, hz, width_hz), hz, 2 * width_hz)
    return out


def rumble():
    """Gusts on the microphone: swells of low band noise."""
    low = rms_one(band_pass(rng.standard_normal(N), 45, 190))
    return low * swells(GUST_EVENTS, GUST_ATTACK_S, GUST_T60_S)


def tub_echo(x):
    """Sound rattling between the close tub walls: a chain of allpass delays."""
    turn, smear = -2j * np.pi * np.fft.rfftfreq(N, 1 / SR), rfft(x)
    for lag_s in ECHO_LAGS_S:
        late = np.exp(turn * lag_s)
        smear = smear * (late - ECHO_LOOP) / (1 - ECHO_LOOP * late)
    return from_db(ECHO_DB) * irfft(smear * np.exp(turn * ECHO_LAGS_S[0]), N)


def scene():
    """Sound reaches the right port slightly before the left; the lag is applied below about 7.4 kHz."""
    splash = stream() + splats() + plops() + drips() + bubbles()
    heard = splash + tub_echo(splash) + tub() + rumble() + hiss()
    hz = np.fft.rfftfreq(N, 1 / SR)
    lag_s = PORT_LAG_S / (1 + (hz / 7400) ** 30)
    sides = np.array([[1], [-1]])   # left half a lag late, right half a lag early
    return irfft(rfft(heard) * np.exp(-1j * np.pi * hz * lag_s * sides), N)


def record(dry):
    """Steep low-pass, 70 dB down from the stopband edge."""
    return signal.sosfilt(signal.cheby2(16, 70, STOPBAND_HZ, fs=SR, output="sos"), dry)


dry = scene()
out = record(dry)
output_pcm(out)
```